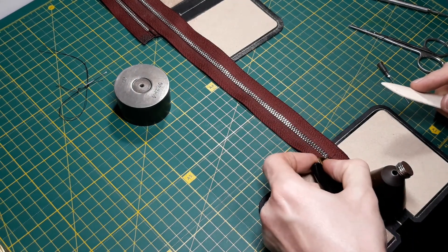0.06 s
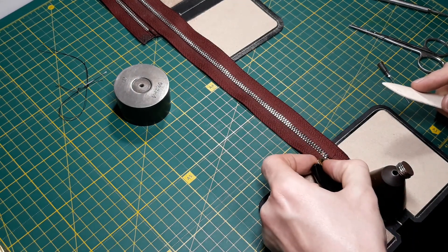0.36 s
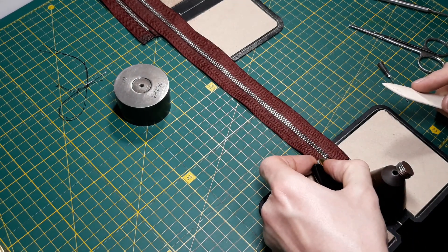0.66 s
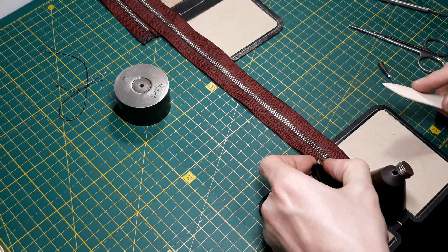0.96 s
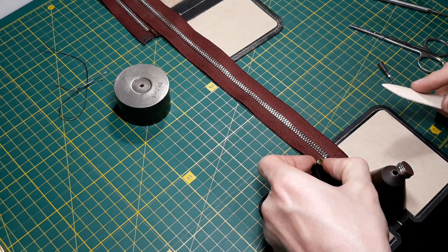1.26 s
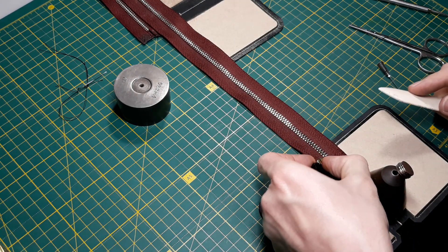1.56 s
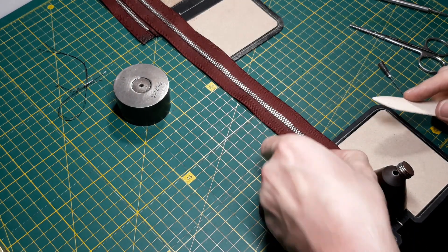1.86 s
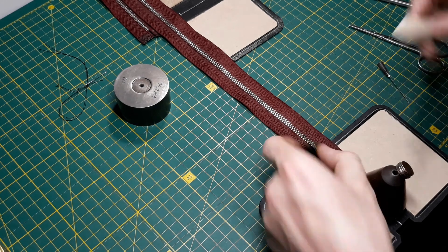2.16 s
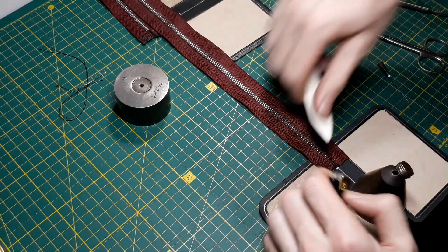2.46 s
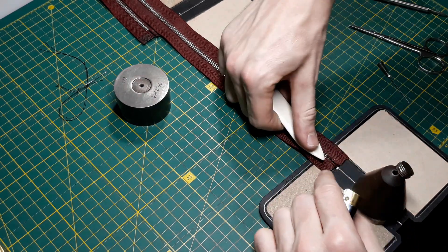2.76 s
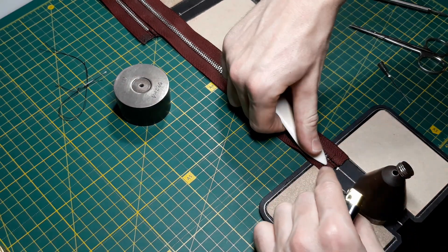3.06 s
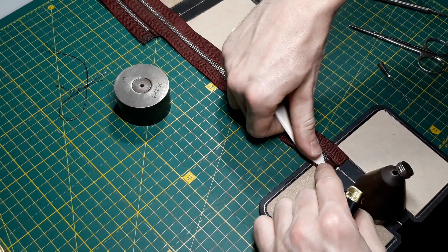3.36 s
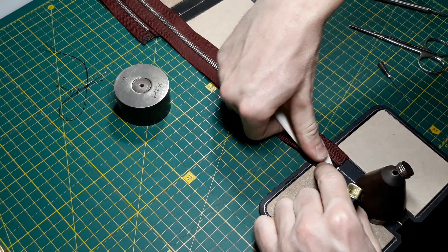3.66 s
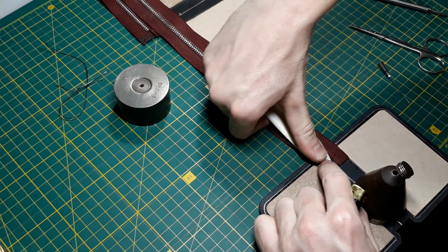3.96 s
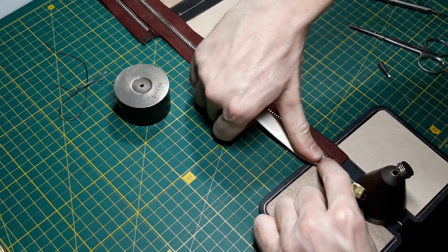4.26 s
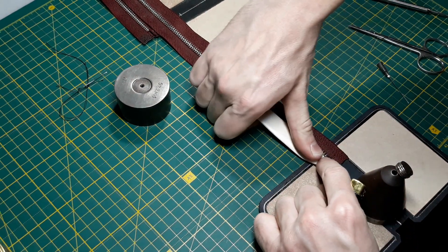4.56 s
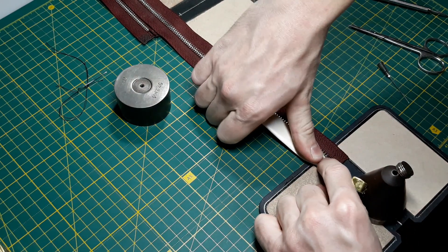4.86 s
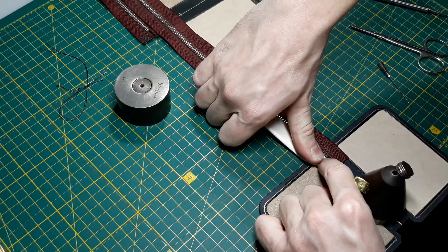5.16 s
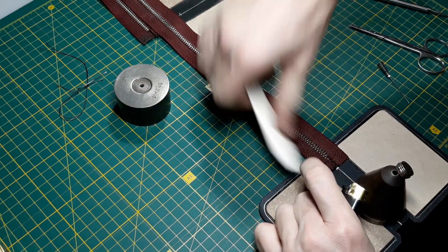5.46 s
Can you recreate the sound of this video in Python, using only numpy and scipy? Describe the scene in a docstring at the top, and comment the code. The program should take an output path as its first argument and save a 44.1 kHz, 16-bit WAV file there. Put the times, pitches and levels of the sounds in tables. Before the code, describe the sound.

Close to a workbench in a small, dry room, a little metal clamp slips and snaps shut with a short ring, by far the loudest sound. A near-still moment follows. Then come light ticks and soft brushing of fingers on zipper tape, a few faint leather creaks, and a scattering of soft knocks as a bone folder presses the seam against the cutting mat.

```python
"""Over two faint, brief wavering tones, a small metal clamp scrapes off its seat and snaps shut, ringing.
Then a zipper tape is pressed onto leather: fingers tick and brush over tape and teeth, the leather gives
low creaks, and a bone folder rubs and presses the seam, softly knocking the cutting mat and the bench.
One microphone, close to the workbench, in a small, dry room."""
import sys
import numpy as np
from scipy import signal
from scipy.fft import rfft, irfft
from scipy.io import wavfile

SR = 44100
rng = np.random.default_rng(int(sys.argv[2]) if len(sys.argv) > 2 else 0)


def store_wav(level_fs):
    """Save 16-bit WAV to argv[1]."""
    pcm = np.round(np.clip(np.atleast_2d(level_fs), -1, 1) * 32767)
    wavfile.write(sys.argv[1], SR, pcm.T.astype(np.int16))


N = 252296
TIME = np.arange(N) / SR


# the jaws sliding ever harder, then letting go: time_s, level_db
SLIDE_LEVELS = [(0.06, -85), (0.094, -48), (0.111, -44), (0.118, -28), (0.126, -24), (0.135, -17),
                (0.138, -10), (0.141, -50), (0.15, -100)]
# resonances of the sliding jaws: pitch_hz, width_hz, gain_db
SLIDING_JAW_MODES = [(1840, 270, -11), (2400, 410, -8.5), (3250, 400, -12.5), (5530, 400, -11.5),
                     (7620, 250, -8), (8600, 280, -6), (9600, 350, 0), (10700, 440, 2), (11200, 350, 2.5),
                     (12900, 570, -6), (14500, 450, -12.5)]

def clamp_slide(slips_per_s=750, jitter=.35, slip_decay=1.8):
    """The jaws stick and slip; each slip is a puff of grit that fades before the next."""
    unsteadiness = unit_power(cut(rng.standard_normal(N), slips_per_s, "low"))
    slips = np.cumsum(slips_per_s * (1 + jitter * unsteadiness)) / SR
    grit = rng.choice([-1, 1], N) * np.exp(-slip_decay * (slips % 1))
    effort = amp(np.interp(TIME, *np.transpose(SLIDE_LEVELS)))
    return resonate(grit * effort, SLIDING_JAW_MODES) / np.std(resonate(grit, SLIDING_JAW_MODES))


# the jaws striking each other: start_s, level_db, low_cut_hz, chatter_s
JAW_STRIKES = [(0.1000, -26, 1500, .0002), (0.1364, 8.5, 8500, 0.00034), (0.1371, 10, 7500, .0006),
               (0.1379, 10, 1220, 0.00053), (0.1392, 10, 448, 0.00042), (0.141, -8, 2000, 0.00084),
               (0.1553, -20.5, 2000, .0003), (0.1605, -21, 900, .004), (0.1985, -33, 900, 0.0027)]
# resonances of the closed clamp: pitch_hz, width_hz, gain_db
CLOSED_CLAMP_MODES = [(855, 810, -7), (1846, 220, 4.5), (2450, 165, 3), (2800, 190, 5), (3290, 260, 6),
                      (4303, 530, 3.5), (5670, 340, -3.5), (7650, 450, -9.5), (8900, 290, 0),
                      (10060, 290, 5.5), (10140, 200, 1), (10800, 220, -5), (11400, 220, -2.5),
                      (13100, 568, -4), (14400, 240, 1.5), (15060, 300, 9)]

def clamp_snap(chatter=.19, crack_db=-16):
    """Hard contacts with a trace of chatter ring the clamp, close to the microphone."""
    force, t = np.zeros(N), TIME[:SR // 50]
    for start_s, db, low_cut_hz, chatter_s in JAW_STRIKES:
        contact = chatter * rng.choice([-1, 1], len(t)) * np.exp(-t / chatter_s)
        contact[0] = 1
        add(force, start_s, amp(db) * cut(contact, low_cut_hz, "high"))
    return resonate(force, CLOSED_CLAMP_MODES) + amp(crack_db) * force


# the clamp's snap jolting the mat: start_s, level_db, pitch_hz
CLAMP_JOLTS = [(0.1367, -31.5, 170), (0.1375, -23, 680)]
# presses on the seam; the hand's weight, bench ring and scuff are relative to the level:
# start_s, level_db, pitch_hz, weight_db, ring_db, scuff_db, brightness_hz
SEAM_PRESSES = [(1.9687, -47, 750, -15, -12, -10, 4000), (2.1405, -48, 380, -8, -10, -10, 6000),
                (2.2478, -43, 600, -20, -18, -16, 4000), (3.7185, -37, 490, -3, -12, -18, 2000),
                (3.8204, -35.5, 473, -15, -7, -14, 3000), (3.8945, -38, 466, -16, -14, -12, 2200),
                (3.9075, -37, 410, -12, -15, -22, 2500), (4.0075, -45.5, 400, -14, -12, -18, 2500),
                (4.1935, -35, 415, -0.5, -2, -7, 6200), (4.6632, -35.5, 430, -12, -6, -18, 3500),
                (4.9440, -30, 410, -8.5, -2, -16, 2400), (5.0205, -49.5, 420, 4, -2, -15, 4000),
                (5.1505, -49, 437, -12, -13, -12, 3000), (5.1925, -48.5, 453, -12, -15, -13, 3500),
                (5.2925, -49, 450, -15, -12, -8, 2500), (5.3485, -48, 460, -15, -10, -14, 2500),
                (5.3690, -46.5, 380, -7, -5, -9, 1500), (5.4425, -46, 430, -20, -5, -10, 2500)]

def mat_pushes(weight_hz=142, rebound_hz=255, judder_hz=455, judder_start_s=3.839, judder_gap_s=.0115):
    """Clamp, hand and folder push the mat; yields start_s, level_db, pitch_hz, swell_cycles, ring_db."""
    for start_s, db, hz in CLAMP_JOLTS:
        yield start_s, db, hz, .36, -18
    for start_s, db, hz, weight_db, ring_db, _, _ in SEAM_PRESSES:
        yield start_s + .0015, db, hz, .87, ring_db  # the mat gives
        yield start_s + .003, db + weight_db, weight_hz, .45, ring_db  # the hand's weight lands
        yield start_s + .016, db + ring_db - 9.5, rebound_hz, .87, -7  # the bench kicks back once
    # the folder judders along the seam, each slip louder than the last
    for k, jitter in enumerate(rng.normal(0, .1, size=4)):
        yield judder_start_s + (k + jitter) * judder_gap_s, -45.5 + 1.9 * k, judder_hz, 1.2, -10


# resonances of the bench under the mat: pitch_hz, width_hz, gain_db
WORKBENCH_MODES = [(95, 12, 6), (129, 19, -3.5), (197, 22, 0.5), (281, 23, 5), (365, 18, -1), (437, 14, -4),
                   (636, 24, 9.5)]

def knocks(low_cut_hz=60, bench_lag_s=.0049):
    """Each push rocks the mat for a few cycles; the bench under it rings a moment later."""
    mat, bench_drive, t = np.zeros(N), np.zeros(N), TIME[:SR // 4]
    for start_s, db, hz, swell_cycles, ring_db in mat_pushes():
        swell_s = swell_cycles / hz
        envelope = t / swell_s * np.exp(1 - t / swell_s)
        push = amp(db) * envelope * np.sin(2 * np.pi * hz * t)
        add(mat, start_s, push)
        add(bench_drive, start_s + bench_lag_s, amp(ring_db) * push)
    bench = sum(resonate(bench_drive, [mode]) for mode in WORKBENCH_MODES)
    return cut(mat + bench, low_cut_hz, "high")


# small metal parts and fingernails ticking: start_s, level_db, pitch_hz, t60_s, grit_db
SMALL_TOUCHES = [(0.1755, -17.5, 9900, .0017, -6), (0.5770, -54, 3000, .005, 5),
                 (1.9703, -23, 2920, .0021, -9.5), (1.9712, -37, 1750, .012, -8),
                 (2.1180, -45, 2000, .0046, 0), (2.1423, -41, 2600, .0036, -3),
                 (2.2468, -42, 3000, .0044, -3), (2.2485, -41, 1210, .023, -14),
                 (2.2805, -35, 1980, .0035, -14), (2.4140, -33, 3900, .003, -2.5),
                 (2.6628, -29.5, 1770, .0047, -10), (2.7055, -37.5, 2800, .0037, -3),
                 (2.9, -31, 2910, .007, -5), (2.9042, -37, 2850, .0065, -1), (3.8204, -37, 1380, .009, -9),
                 (3.8940, -32, 2700, .008, -18), (4.1928, -40, 3900, .0095, -6),
                 (4.4570, -43.5, 2030, .012, -9), (4.5150, -45, 1480, .012, -6),
                 (4.944, -41, 2950, .01, -7), (5.6983, -38, 2530, .004, -2)]

def ticks(grit_t60_s=.0076, onset_s=.000079, tip_db=-9, tip_hz=1380, tip_t60_s=.009, tip_grit_db=-5):
    """A small hard touch, alone or at the start of a press: one damped ring and a burst of grit."""
    out, t = np.zeros(N), TIME[:SR // 20]
    tips = [(start_s, db + tip_db, tip_hz, tip_t60_s, tip_grit_db) for start_s, db, *_ in SEAM_PRESSES]
    for start_s, db, hz, t60_s, grit_db in list(SMALL_TOUCHES) + tips:
        ring = np.sin(2 * np.pi * hz * t) * amp(-60 * t / t60_s)
        burst = amp(grit_db - 60 * t / grit_t60_s) * (1 - np.exp(-t / onset_s))
        grit = cut(burst * rng.standard_normal(len(t)), 900, "high")
        add(out, start_s, amp(db) * (ring + cut(grit, 11000, "low", order=1)))
    return out


# clamp, fingers and folder scuffing tape and leather: peak_s, level_db, fall_s, brightness_hz
SCUFF_STROKES = [(0.159, -40, .012, 14100), (2.42, -56, .031, 7000), (2.552, -45, .016, 18000),
                 (2.652, -47.5, .033, 16000), (2.805, -53.5, .042, 16000), (2.978, -56, .02, 9000),
                 (3.868, -57, .022, 3000), (3.895, -36, .0036, 13900), (4.13, -57, .028, 8100),
                 (4.373, -54.5, .016, 12000), (4.462, -50.5, .026, 14000), (5.615, -57.5, .009, 3500),
                 (5.671, -50.5, .016, 11100)]
# colour of a scuff at close range: frequency_hz, level_db
SCUFF_SPECTRUM = [(200, -6), (600, 4.5), (1000, 1.5), (1800, 4.5), (2900, 3), (4300, 3), (6500, -4),
                  (9500, 5), (13000, 7.5), (16000, 4)]

def scuffs(rise_share=.8, press_lag_s=.001, press_rise_s=.003, press_fall_s=.01):
    """Each stroke of friction swells and dies; every press drags a short one with it."""
    out, grain = np.zeros(N), colour(friction(slips_per_s=9000, spread_db=4), SCUFF_SPECTRUM)
    free = [(peak_s, db, rise_share * fall_s, fall_s, hz) for peak_s, db, fall_s, hz in SCUFF_STROKES]
    pressed = [(start_s + press_lag_s, db + scuff_db, press_rise_s, press_fall_s, hz)
               for start_s, db, *_, scuff_db, hz in SEAM_PRESSES]
    for peak_s, db, rise_s, fall_s, brightness_hz in free + pressed:
        span = np.abs(TIME - peak_s) < 10 * fall_s
        t = TIME[span] - peak_s
        envelope = np.exp(-np.abs(t) / np.where(t < 0, rise_s, fall_s))
        out[span] += amp(db) * envelope * unit_power(cut(grain[span], brightness_hz, "low"))
    return out


# skin gliding along the tape: middle_s, level_db, length_s
GLIDE_STROKES = [(2.1, -66, .36), (2.5, -54.5, .06), (2.61, -56, .1), (2.81, -61.5, .16), (3.55, -69, .2),
                 (3.87, -62, .06), (5.02, -65, .08), (5.71, -57, .06)]
# colour of skin on the weave: frequency_hz, level_db
GLIDE_SPECTRUM = [(1500, -13), (3000, -12), (7500, -11.5), (8800, -8), (9600, -3), (10500, -12.5),
                  (13000, -16), (16000, -25.5)]

def gliding():
    """Fingers slide lightly and hiss on the weave of the tape."""
    touch = sum(swell(*stroke) for stroke in GLIDE_STROKES)
    return touch * colour(friction(slips_per_s=12000, spread_db=3), GLIDE_SPECTRUM)


# hands and folder rubbing under pressure: middle_s, level_db, length_s
RUB_STROKES = [(0.0, -62, .25), (0.98, -64, .2), (1.9, -61, .12), (2.22, -58.5, .17), (2.53, -59, .24),
               (2.92, -62, .22), (3.27, -55, .1), (3.41, -55, .11), (3.58, -55, .11), (3.88, -56, .13),
               (4.24, -61.5, .2), (5.36, -66, .2), (5.68, -62, .08)]
# colour of rubbing heard through leather: frequency_hz, level_db
RUB_SPECTRUM = [(60, -13), (130, -4.5), (185, -4.5), (260, -3), (450, -3.5), (750, -9.5), (1400, -14),
                (2500, -19), (6000, -28)]

def rubbing(resting_db=-65.5):
    """Firm rubbing murmurs through the leather, and faintly while the hands only hold the work."""
    pressure = np.sqrt(amp(resting_db) ** 2 + sum(swell(*stroke) ** 2 for stroke in RUB_STROKES))
    return pressure * colour(friction(slips_per_s=4000, spread_db=2.5), RUB_SPECTRUM)


# two faint, brief wavering tones at the start, then low leather creaks:
# middle_s, level_db, length_s, pitch_hz
TONES_AND_CREAKS = [(0.012, -59, .03, 570), (0.1, -60, .05, 640), (0.97, -63.5, .25, 250),
                    (2.888, -58, .04, 125), (3.265, -58, .065, 232), (3.39, -53.5, .07, 243),
                    (3.53, -63, .14, 260), (3.615, -58.5, .02, 145)]

def tones_and_creaks(wander=.0715, wander_hz=40, flutter=.49):
    """Each is one wavering partial; the low ones are leather sticking and slipping, muted by the mat."""
    drift, tremble = [unit_power(cut(noise, wander_hz, "low")) for noise in rng.standard_normal((2, N))]
    wavering_time = np.cumsum(1 + wander * drift) / SR
    out = np.zeros(N)
    for middle_s, db, length_s, hz in TONES_AND_CREAKS:
        tone = np.sin(2 * np.pi * hz * wavering_time) * (1 + flutter * tremble)
        out += swell(middle_s, db, length_s) * unit_power(tone)
    return out


def room(direct, tools_t60_s=.04, walls_t60_s=.19, first_echo_s=.0027, bass_hz=700, bass_boost=.83):
    """Quick reflections off nearby tools, too small to return bass, then a warmer tail from the walls."""
    t = TIME[:SR // 3]
    near, far = rng.standard_normal((2, len(t))) * (t > first_echo_s)
    near *= amp(-60 * t / tools_t60_s)
    far *= amp(-60 * t / walls_t60_s)
    tools = amp(-11) * cut(near / np.linalg.norm(near), bass_hz, "high")
    walls = amp(-16) * cut(far / np.linalg.norm(far), 8000, "low", order=1)
    walls += bass_boost * cut(walls, bass_hz, "low", order=1)
    return direct + signal.fftconvolve(direct, tools + walls)[:N]


# colour of the still room and the microphone's hiss: frequency_hz, level_db
ROOM_TONE_SPECTRUM = [(12, -33), (20, -11.5), (64, -4), (119, -12.5), (191, -17), (252, -15), (452, -18.5),
                      (505, -17.5), (811, -18.5), (932, -21.5), (1160, -21.5), (1450, -22.5), (2090, -24),
                      (2270, -24), (15500, -26)]

def room_tone(level_db=-59):
    """The still room and the microphone lay a steady, faint noise under the work."""
    return amp(level_db) * colour(rng.standard_normal(N), ROOM_TONE_SPECTRUM)


def friction(slips_per_s, spread_db):
    """Tiny slips of uneven size at random moments; unit power."""
    sizes = amp(spread_db * np.minimum(rng.exponential(1, N), 4))
    slipping = rng.random(N) < slips_per_s / SR
    return unit_power(slipping * sizes * rng.choice([-1, 1], N))


def resonate(x, modes):
    """Ring parallel resonances of (pitch_hz, width_hz, gain_db), signs alternating."""
    out = np.zeros(N)
    for k, (hz, width_hz, db) in enumerate(modes):
        radius = np.exp(-np.pi * width_hz / SR)
        poles = [1, -2 * radius * np.cos(2 * np.pi * hz / SR), radius ** 2]
        ring = (1 - radius ** 2) / 2 * signal.lfilter([1, 0, -1], poles, x + 1e-18)
        out += (-1) ** k * amp(db) * ring
    return out


def swell(middle_s, db, length_s):
    """Gain of a smooth stroke that comes and goes around middle_s."""
    return amp(db) * np.exp(-2 * np.minimum(((TIME - middle_s) / length_s) ** 2, 20))


def colour(noise, spectrum):
    """Give a steady noise a spectrum; unit power."""
    hz, db = np.transpose(spectrum)
    bins_hz = np.maximum(np.arange(N // 2 + 1) * SR / N, 1)
    gain = amp(np.interp(np.log(bins_hz), np.log(hz), db))
    return unit_power(irfft(rfft(noise) * gain, N))


def cut(x, hz, kind, order=2):
    """Low- or high-pass filter; kind names the side that passes."""
    return signal.sosfilt(signal.butter(order, hz, kind, fs=SR, output="sos"), x)


def add(track, start_s, sound):
    """Mix a short sound in at start_s."""
    start = max(round(start_s * SR), 0)
    track[start:start + len(sound)] += sound[:N - start]


def amp(db):
    """Decibels to gain."""
    return 10 ** (np.asarray(db) / 20)


def unit_power(x):
    """Scale to a mean square of one."""
    return x / np.sqrt(np.mean(x ** 2) + 1e-20)


def scene():
    """The handwork and two faint tones from close beside the bench, in mono, over quiet room tone."""
    work = clamp_slide() + clamp_snap() + knocks() + ticks() + scuffs() + gliding() + rubbing()
    direct = work + tones_and_creaks()
    return (room_tone() + room(direct))[None]


def record(dry):
    """The highest peaks are rounded and the treble is cut steeply, gone by 16.7 kHz."""
    rounded = np.tanh(dry)
    return signal.sosfilt(signal.cheby2(24, 100, 16700, fs=SR, output="sos"), rounded)


dry = scene()
out = record(dry)
store_wav(out)
```